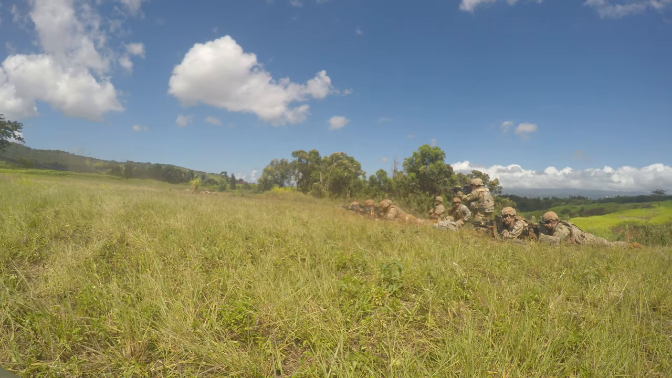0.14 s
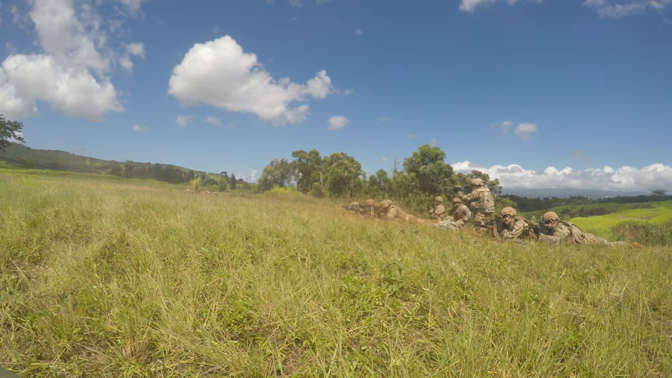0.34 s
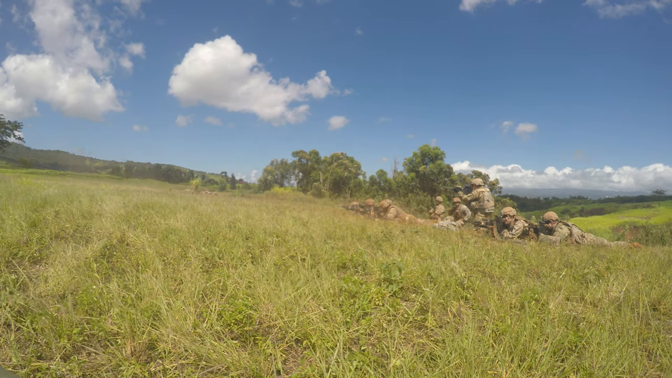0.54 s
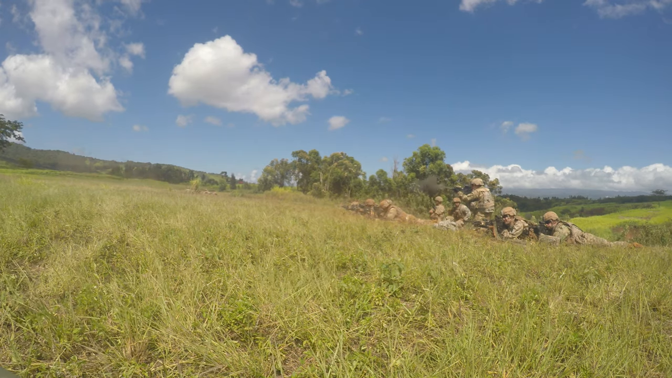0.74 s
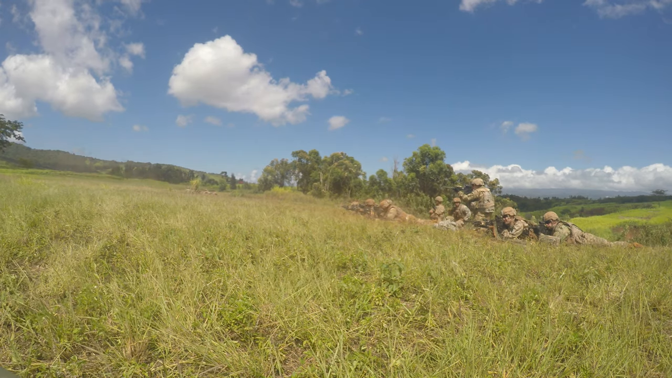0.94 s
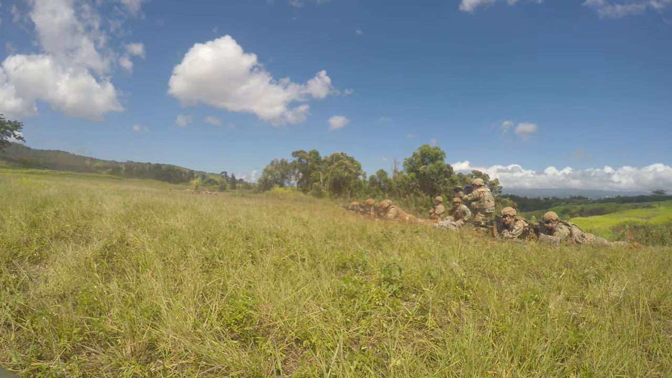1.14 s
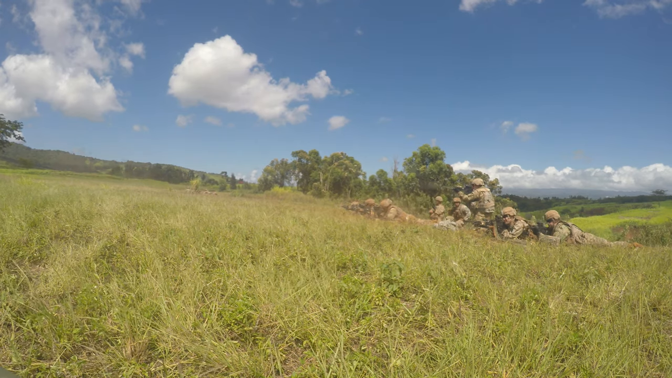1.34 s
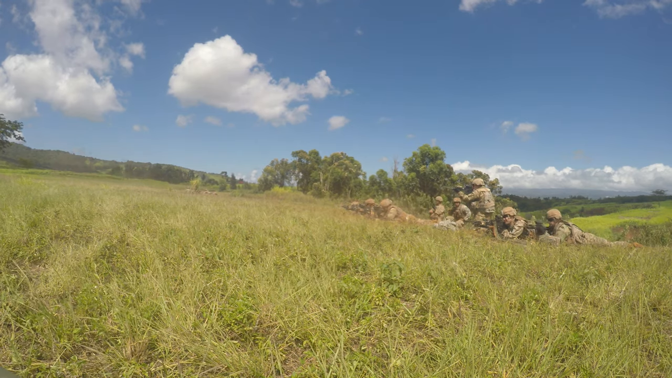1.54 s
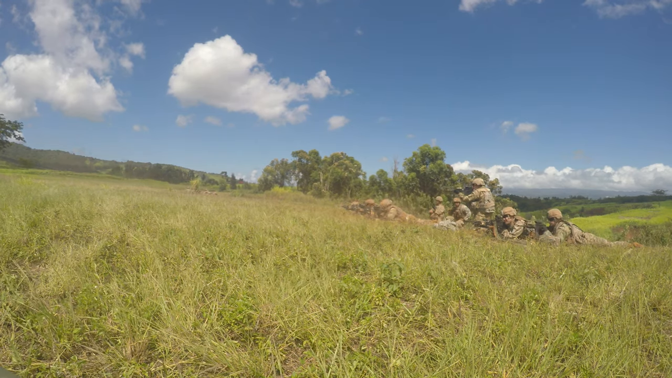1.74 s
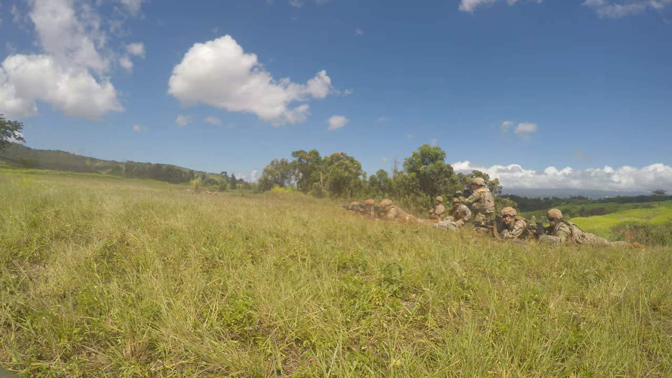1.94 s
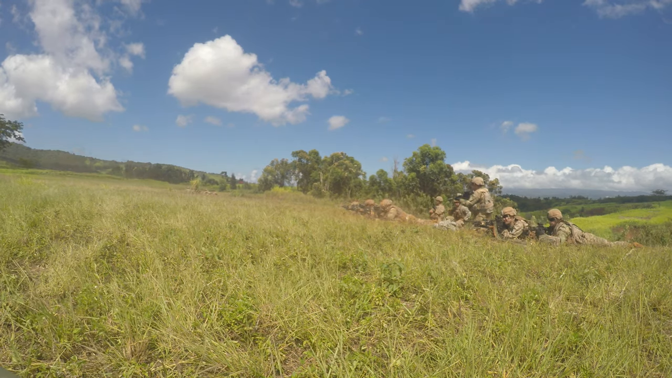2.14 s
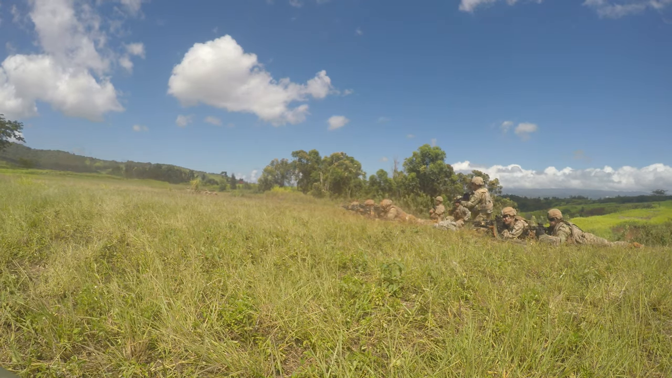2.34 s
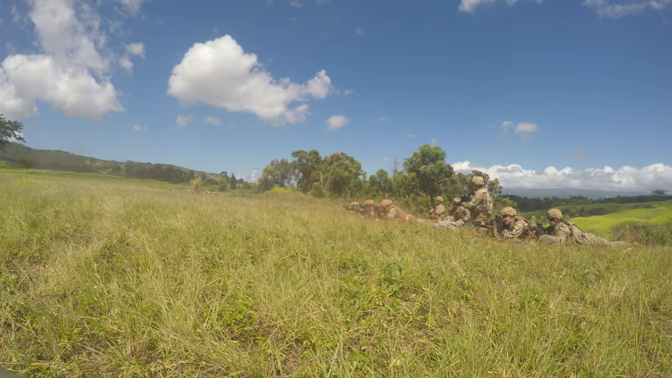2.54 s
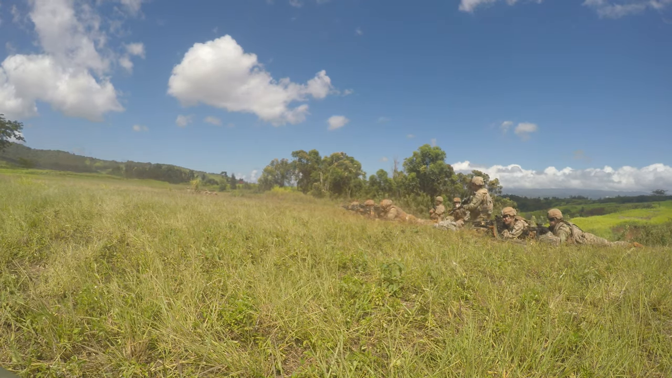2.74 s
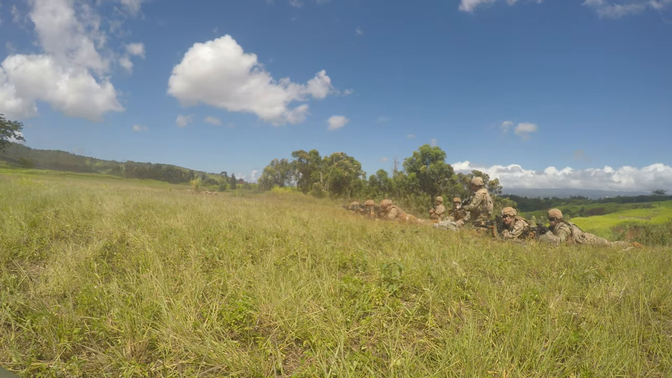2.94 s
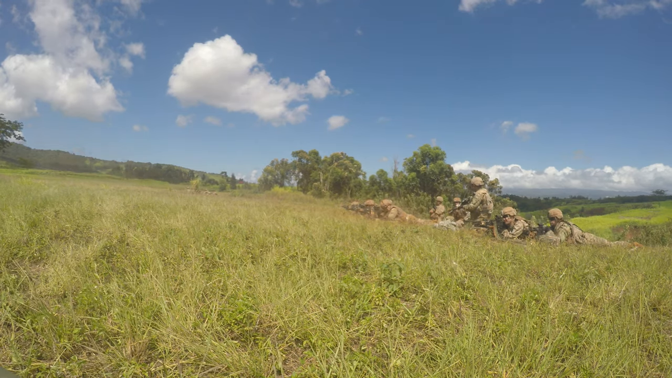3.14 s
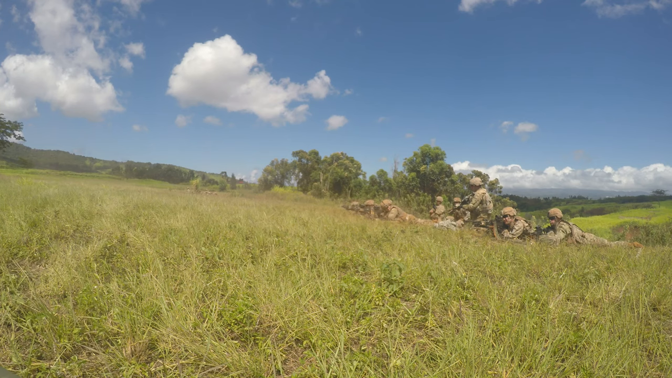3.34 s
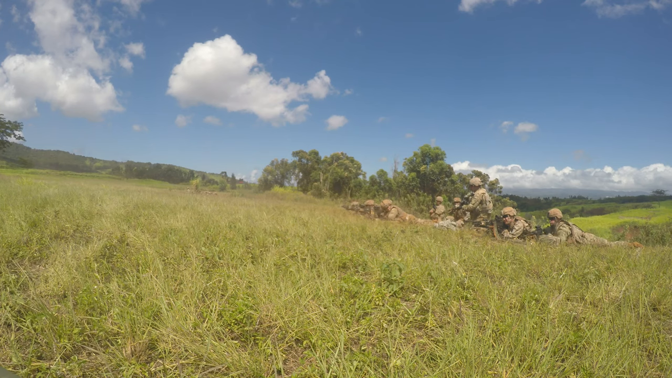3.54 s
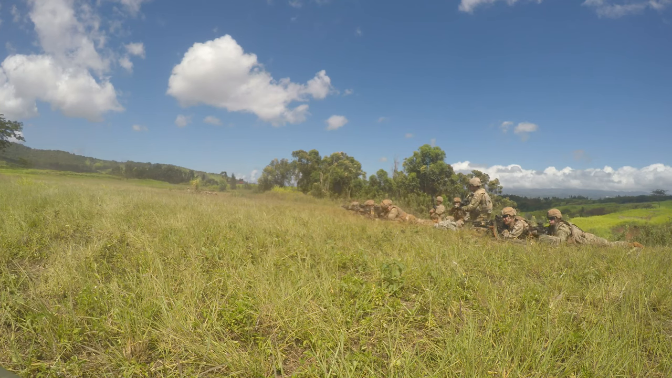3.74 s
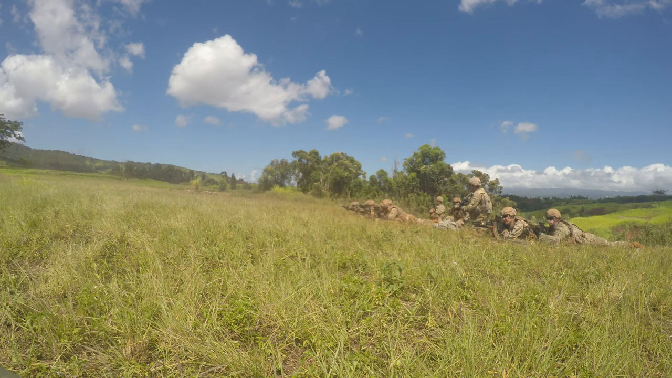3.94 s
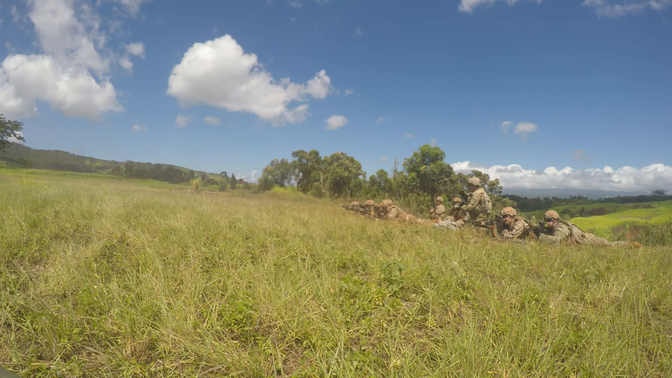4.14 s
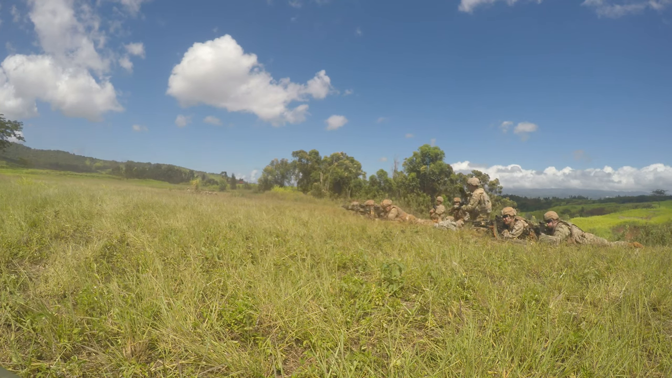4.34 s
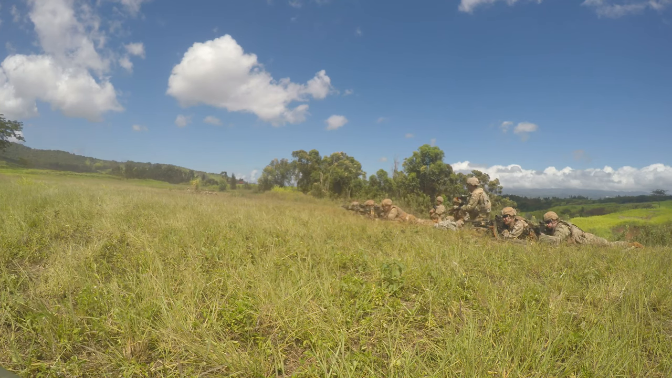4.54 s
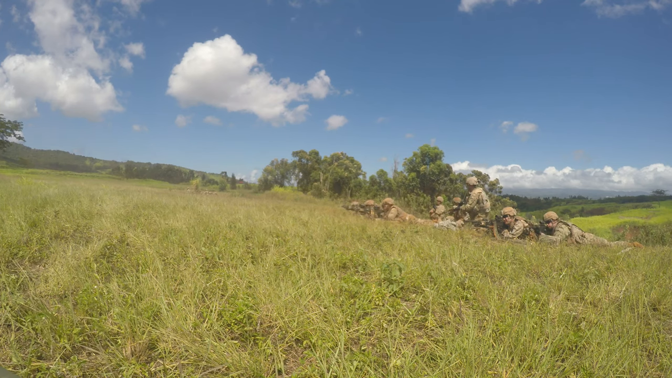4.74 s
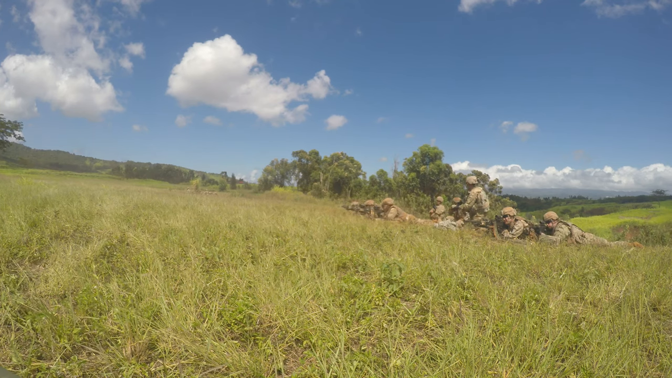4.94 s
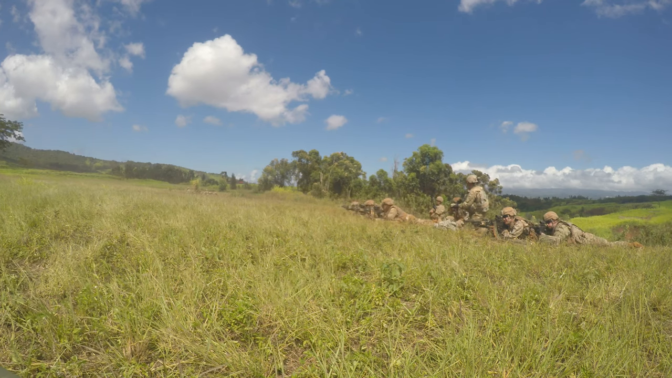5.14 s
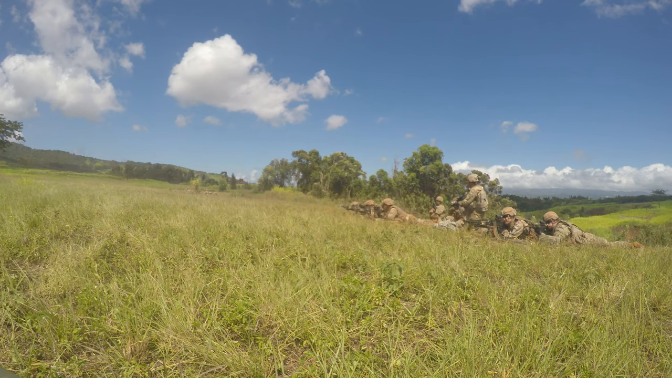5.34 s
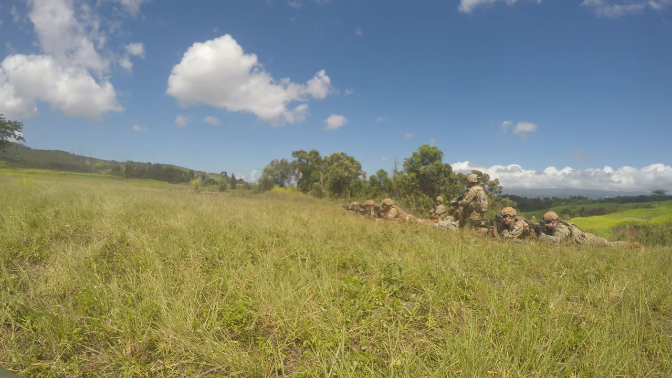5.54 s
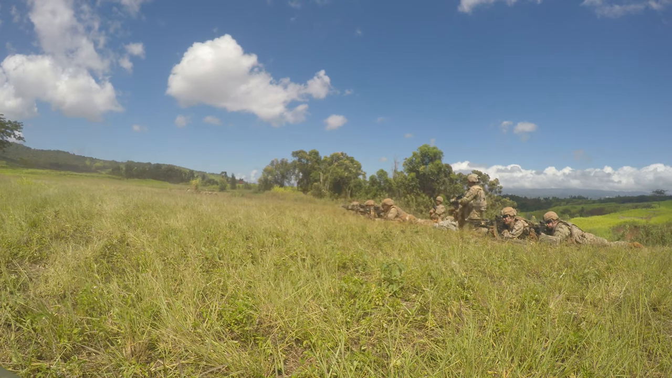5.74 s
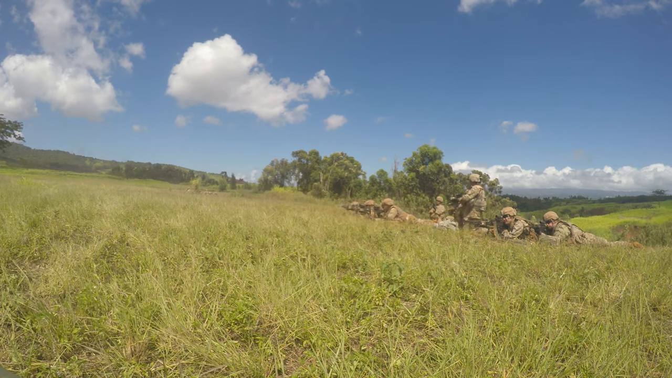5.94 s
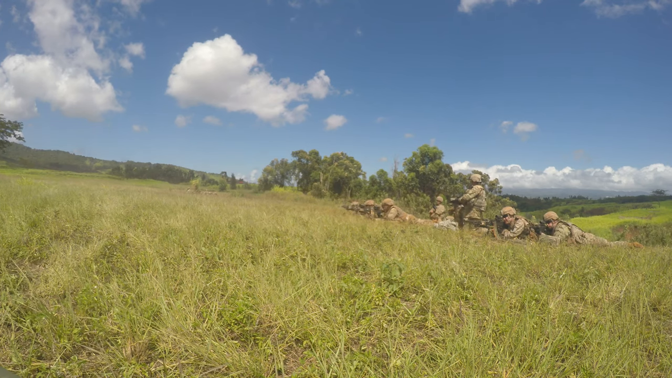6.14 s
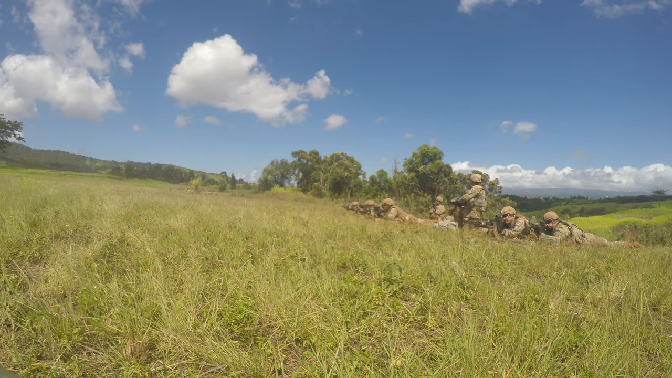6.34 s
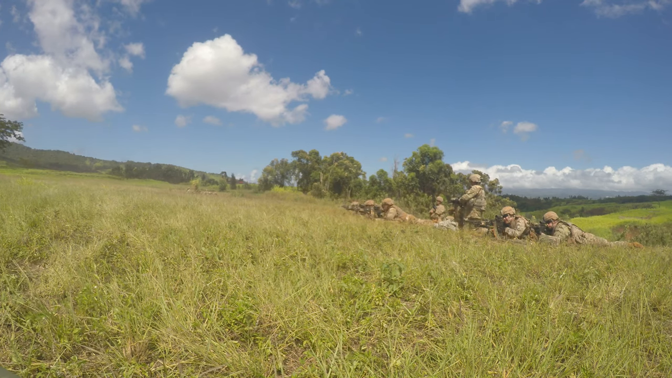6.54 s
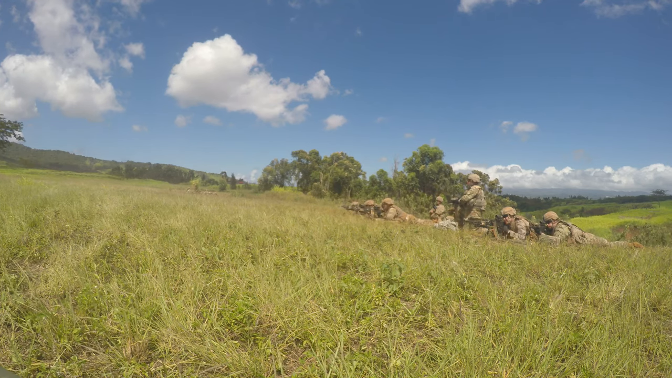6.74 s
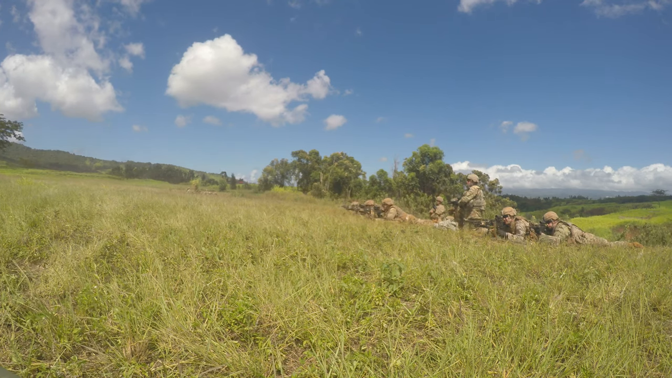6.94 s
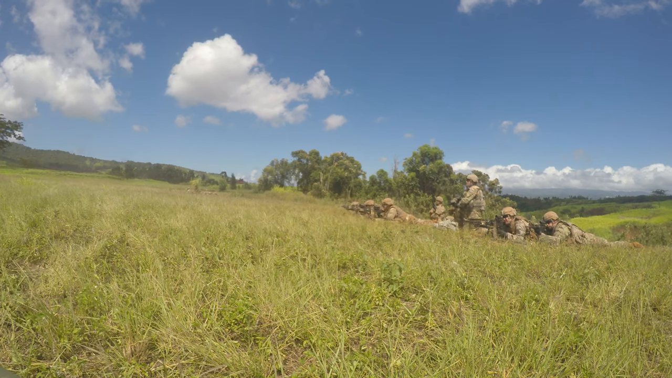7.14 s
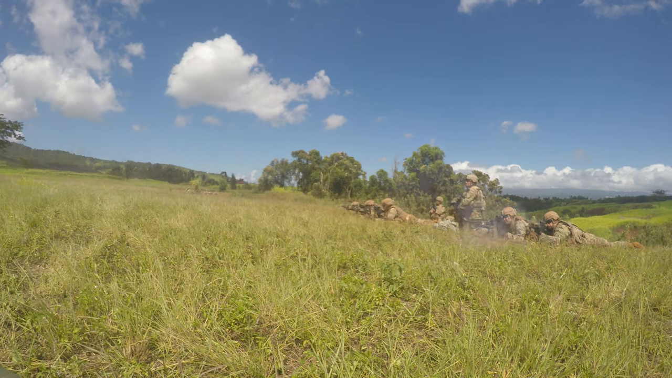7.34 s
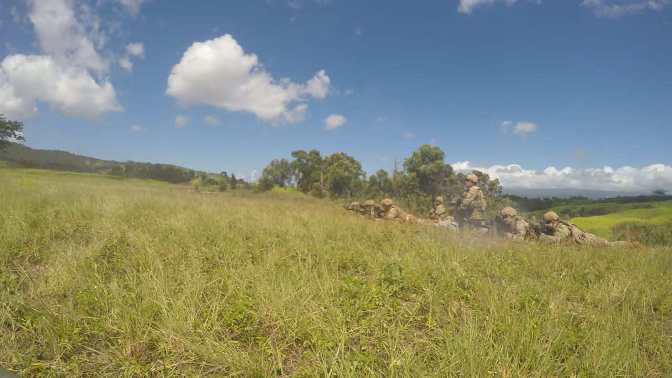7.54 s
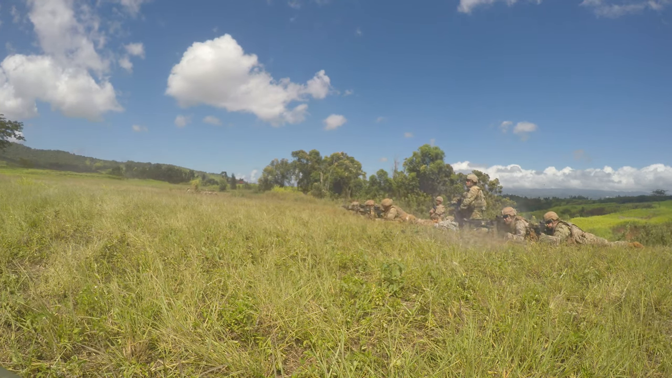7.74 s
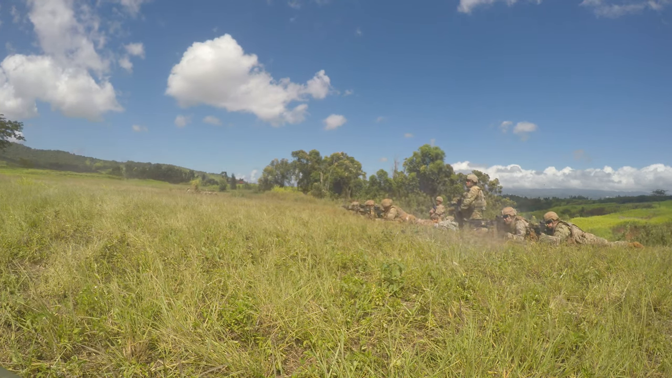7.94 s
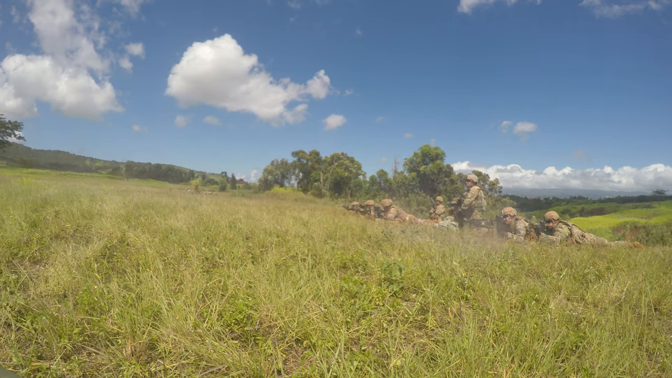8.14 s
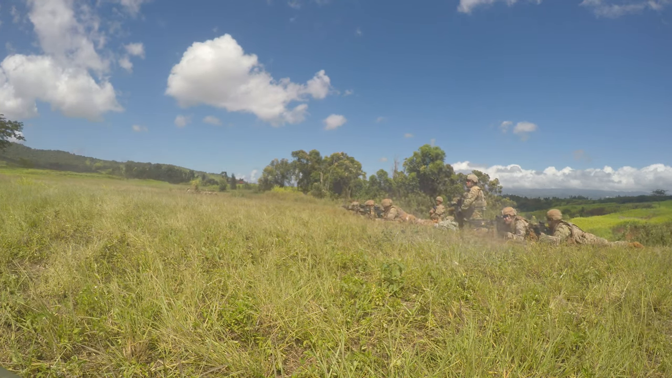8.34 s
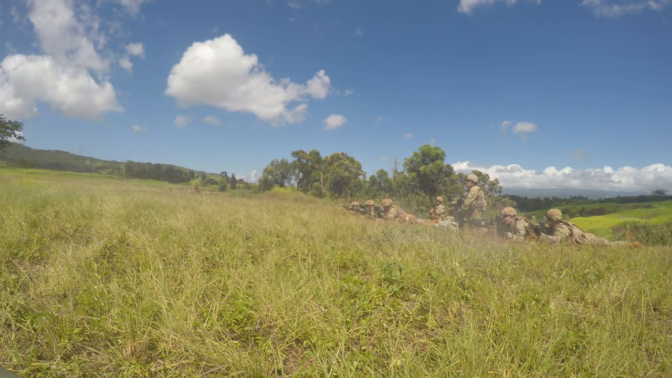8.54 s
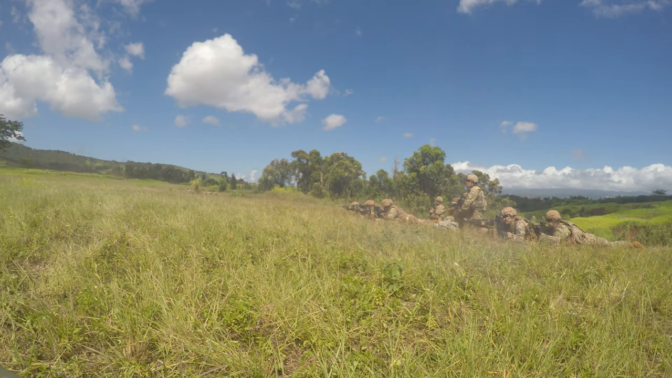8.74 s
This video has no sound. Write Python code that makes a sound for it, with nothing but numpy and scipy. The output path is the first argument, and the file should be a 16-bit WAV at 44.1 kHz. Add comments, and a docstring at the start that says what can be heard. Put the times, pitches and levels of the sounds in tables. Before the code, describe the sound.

Faint hiss and a low wash of hill echoes lie under everything on an open grass slope. At once a medium-speed machine gun fires; a close rifle cracks at 0.2 s and a slower gun joins from 0.3 to 1.6 s, with more close shots around 0.4, 0.8, 1.3, 1.7 and 2.0 s. From 1.9 s the medium and then slow guns hammer long overlapping bursts, stopping near 3.4 and 3.8 s, leaving echoes. The slow gun returns at 4.3 s, a close shot hits at 4.8 s, and medium and rapid guns rattle from about 5 to 6.4 s. Slow rounds continue; close shots strike at 6.8 s and, loudest, 7.2 s, after which farther fire is pushed down and climbs back. The rapid gun resumes at 7.6 s, and all three fire to the end, with a close shot at 8.3 s. The microphone case rings boxily, and nearest blasts clip.

```python
"""Live fire on an open grass slope: hiss and a low wash of hill echoes (shaped noise) are there from the start.
A middle-speed machine gun fires first, then a rifle close by and a slow gun join; rounds are cracks and thumps.
From 1.9 s both guns fire long bursts; the slow gun returns at 4.3 s, the middle and a fast one near 5 s.
After scattered close shots all three guns fire at the end. The farther fire starts sunk and climbs back, and sinks
again after each close shot. Throughout, the microphone case rings, and the nearest shots overload the input."""
import sys
import numpy as np
from scipy import signal
from scipy.fft import rfft, irfft
from scipy.io import wavfile

SR = 44100
rng = np.random.default_rng(int(sys.argv[2]) if len(sys.argv) > 2 else 0)


def master(y):
    """Save y as 16-bit WAV."""
    cut = np.clip(np.atleast_2d(y).T, -1, 1)
    pcm = np.round(cut * 32767)  # scale
    wavfile.write(sys.argv[1], SR, pcm.astype(np.int16))


N = 387198


def amp(db):
    """Turn decibels into a plain multiplying factor."""
    return 10 ** (np.asarray(db) / 20)


def clicks(times, db):
    """One single-sample click per event, as strong as its level says."""
    out = np.zeros(N)
    np.add.at(out, np.round(np.asarray(times) * SR).astype(int), amp(db))
    return out


def dying(x, t60):
    """Every click starts a smooth fall that drops 60 dB in t60 seconds."""
    keep_per_sample = amp(-60 / (t60 * SR))
    return signal.lfilter([1], [1, -keep_per_sample], x + 1e-18)


def noise(colour):
    """Random noise whose strength at each pitch follows a colour table; rms 1."""
    hz, db = np.transpose(colour)
    grid = np.maximum(np.arange(N // 2 + 1) * SR / N, 1)
    gain = amp(np.interp(np.log(grid), np.log(hz), db))
    x = irfft(rfft(rng.standard_normal(N)) * gain, N)
    return x / x.std()


def bands(x):
    """Split a sound into its low, low middle, high middle and high part."""
    shapes = [([300, 1400], "band"), ([1400, 2600], "band"), ([2600, 5000], "band"), (5000, "high")]
    return [signal.sosfilt(signal.butter(2, hz, kind, fs=SR, output="sos"), x) for hz, kind in shapes]


def lumps(depth_db):
    """Quick random swells, as when single echoes stand out of a noisy tail; depth is the rms swing."""
    return amp(depth_db * noise([(20, 1.5), (120, 3.5), (300, -38.5)]))


def echoes(x, table, dull_hz):
    """Direct sound plus delayed copies that have lost their treble on reflection."""
    back = sum(amp(db) * np.interp(np.arange(N) - s * SR, np.arange(N), x, left=0) for s, db in table)
    return x + signal.sosfilt(signal.butter(2, dull_hz, fs=SR, output="sos"), back)


# Slow gun, about 8 rounds a second; the bullet's crack comes before the muzzle:
# (time [s], crack level [dB], its part over 5 kHz [dB re crack], muzzle delay [ms], thump level [dB])
SLOW_GUN = [(0.311, -33, -5, 68, -24), (0.432, -31, -2, 76, -15), (0.5545, -19, -14, 78, -15.5),
            (0.6802, -22.5, -11, 83, -14.5), (0.821, -31, -10, 77, -16), (0.9413, -27, -11, 80, -16),
            (1.0759, -25, -9, 86, -17.5), (1.207, -20.5, -13.5, 82, -17), (1.3375, -42.5, -3, 88, -14),
            (1.471, -26.5, -5.5, 84, -18), (1.605, -22.5, -7.5, 103, -14), (2.48, -16.5, -9.5, 84, -14),
            (2.617, -14.5, -13, 84, -15), (2.7473, -12.0, -9.5, 81, -14.5), (2.8657, -15, -11, 85, -15),
            (2.9943, -12, -9, 98, -15), (3.1376, -19, -4.5, 93, -17.5), (3.263, -10.5, -9, 98, -18),
            (3.4067, -13.5, -7, 93.4, -15.5), (3.538, -14.5, -1.5, 89, -17.5), (3.6638, -14, -1, 92.4, -17),
            (3.7931, -16, -6, 95, -19.5), (4.2998, -18, -15, 75, -16.5), (4.4246, -19.5, -13.5, 78, -17),
            (4.5554, -17.5, -11, 80, -16.5), (4.695, -17, -11.5, 75, -13), (4.823, -18.5, -8, 82, -16),
            (4.9536, -20.5, -8, 79, -16.5), (5.078, -18, -8.5, 79, -17.5), (6.353, -21.5, -1.5, 87, -22),
            (6.4729, -18.5, -4.5, 95, -19), (6.6005, -21, -6, 88, -21), (6.7277, -24, -11, 110, -13),
            (6.8469, -23.5, -10, 94, -19), (6.9796, -18.5, -9.5, 83, -15), (7.1095, -19.5, -8, 123, -14),
            (7.3796, -23.5, -12.5, 130, -22.5), (7.5085, -23, -13, 84, -26), (8.109, -20, -10.5, 77, -17.5),
            (8.2357, -20.5, -7, 76, -11), (8.3603, -14.5, -8, 84, -18), (8.495, -20.5, -4, 89, -24),
            (8.6146, -20.5, -2.5, 79, -17), (8.7499, -17, -9.5, 85, -17)]
# Middle gun, about 10 rounds a second; its muzzle is heard just before the crack:
# (time [s], crack level [dB], its part over 5 kHz [dB re crack])
MIDDLE_GUN = [(0.048, -14, -20), (0.149, -19.5, -14.5), (0.357, -22, -15), (0.455, -17.5, -17),
              (0.5546, -18.5, -12), (0.6521, -22, -16), (1.8701, -17.5, -16), (2.0656, -12.5, -18),
              (2.1744, -15.5, -36), (2.2712, -15.5, -15.5), (2.3675, -14.5, -24), (2.449, -14, -28),
              (2.5435, -11.5, -13.5), (2.6512, -12, -9.5), (2.7473, -18, -23), (2.844, -10.5, -16),
              (2.9321, -10.5, -34), (3.0367, -8, -21), (3.1372, -8, -22), (3.224, -10.5, -15.5),
              (3.3308, -10.5, -50), (3.428, -11.5, -27), (5.0542, -21.0, -19), (5.1492, -22.5, -36),
              (5.2475, -14.5, -31), (5.343, -17, -22), (5.437, -17.5, -32), (5.5456, -19.5, -14),
              (5.6337, -19, -31), (5.7277, -20, -16), (5.8261, -16.5, -18), (5.9235, -15.5, -19),
              (6.0215, -14.5, -27), (6.1182, -17.5, -19), (6.218, -17.5, -16.5), (6.314, -16.5, -19),
              (6.4109, -17, -29), (7.9186, -12, -24), (8.0237, -14, -40), (8.1229, -14.5, -27),
              (8.221, -14, -23), (8.412, -12.5, -21), (8.5149, -12.5, -26), (8.598, -13.5, -35),
              (8.699, -12.5, -19)]
# Fast gun, about 13 rounds a second; crack and muzzle arrive together:
# (time [s], crack level [dB], thump level [dB])
FAST_GUN = [(5.182, -33.5, -18.5), (5.259, -31, -19), (5.338, -31.5, -15.5), (5.4183, -30, -18),
            (5.492, -30, -14.5), (5.573, -41, -18.5), (5.65, -30, -17), (5.7288, -30.5, -18.5),
            (5.809, -34.5, -14.5), (5.8878, -34, -15), (5.965, -32.5, -17), (6.046, -32.5, -17.5),
            (6.121, -34, -18.5), (6.2033, -34, -16), (6.281, -31, -17), (6.3613, -31, -19),
            (6.4415, -34.5, -13), (7.6195, -35, -18), (7.699, -33, -17), (7.78, -34.5, -18.5),
            (7.858, -35.5, -19.5), (7.942, -37, -19), (8.021, -41, -19.5), (8.102, -33, -17.5),
            (8.1815, -33.5, -17), (8.26, -31.5, -17), (8.338, -28, -13), (8.4133, -33, -14.5),
            (8.497, -26, -17), (8.574, -41, -16.5), (8.646, -33, -16.5), (8.7348, -32, -19.5)]
MIDDLE_LEAD_MS, MIDDLE_THUMP_DB = 19, -25   # muzzle ahead of the crack; its usual thump level
FAST_TREBLE_DB = 0.5   # part of the crack over 5 kHz, re the crack


def rounds():
    """Per gun, slow to fast: crack times, crack dB, treble dB, muzzle times and thump dB."""
    slow, slow_db, slow_treble, lag_ms, slow_thump_db = np.transpose(SLOW_GUN)
    middle, middle_db, middle_treble = np.transpose(MIDDLE_GUN)
    fast, fast_db, fast_thump_db = np.transpose(FAST_GUN)
    middle_muzzle = middle - MIDDLE_LEAD_MS / 1000
    return [(slow, slow_db, slow_treble, slow + lag_ms / 1000, slow_thump_db),
            (middle, middle_db, middle_treble, middle_muzzle, MIDDLE_THUMP_DB + 0 * middle),
            (fast, fast_db, FAST_TREBLE_DB + 0 * fast, fast, fast_thump_db)]


START_SINK_DB, FAST_SINK_DB = 16.5, 3   # sunk at the start; drop after each fast round
CLIMB_S = 0.88   # time constant of the return


def sinking():
    """dB lost by the farther fire: it drops after a shot, then climbs back; the deepest drop counts."""
    t = np.arange(0, N / SR, .001)
    close_drops = np.array(CLOSE)[:, [0, -1]]
    fast_drops = [(s, FAST_SINK_DB) for s, _, _ in FAST_GUN]
    drops = [(0, START_SINK_DB), *close_drops, *fast_drops]
    s, db = np.transpose(drops)[..., None]
    lost = np.max((t > s + .004) * db * np.exp(-np.abs(t - s) / CLIMB_S), axis=0)   # starts 4 ms late
    return np.interp(np.arange(N) / SR, t, lost)


# Colour of the wash of far echoes: (pitch [Hz], level [dB per Hz])
WASH_COLOUR = [(25, 1), (60, 2.5), (150, -3), (280, -8.5), (600, -9.5), (1100, -8.5), (1600, -7),
               (2800, -12), (4500, -11), (6000, -17), (7600, -28), (8600, -29), (11000, -32.5),
               (15000, -35.5)]
# What each machine-gun crack feeds to the wash: (over 600 Hz [dB re crack], under 600 Hz [dB re crack])
CRACK_ECHO_DB = (-28.5, -40)
WASH_HIGH, WASH_LOW = (-54.5, 0.91), (-54, 0.84)   # over and under 600 Hz: (floor [dB], echo t60 [s])
ECHO_RISE_S = 0.01   # how quickly each echo swells up
HISS_DB = -66   # steady hiss that does not sink


def wash(lost_db):
    """Far echoes of the gun cracks and muzzles merge into lumpy noise that swells and dies back to a floor."""
    x = noise(WASH_COLOUR)
    low = signal.sosfilt(signal.butter(1, 600, fs=SR, output="sos"), x)
    high = (x - low) * lumps(depth_db=1.3)
    out = 0
    for k, (part, (floor_db, t60)) in enumerate([(high, WASH_HIGH), (low, WASH_LOW)]):
        fed = 0   # echo power sent in by every round
        for (s, db, _, late, thump_db), muzzle in zip(rounds(), GUN_MUZZLE):
            heard = late < N / SR
            fed = fed + clicks(late[heard], (thump_db + muzzle[1 + k])[heard]) ** 2
            fed = fed + clicks(s, db + CRACK_ECHO_DB[k]) ** 2
        # t60 is halved because this fall is applied to power, not to amplitude
        swell = dying(fed, t60 / 2) - dying(fed, min(ECHO_RISE_S, t60 / 4))
        power = np.maximum(swell, 0) + amp(floor_db) ** 2
        level = np.sqrt(power * amp(-lost_db) ** 2 + amp(HISS_DB) ** 2)
        out = out + level * part / part.std()
    return out


# Colour of the weak scatter after a crack: (pitch [Hz], level [dB per Hz])
CRACK_COLOUR = [(300, -14.5), (600, -10), (1000, 7.5), (2000, 7), (4000, -10), (6000, 0), (7600, -13),
                (8600, -27), (11000, -21), (15000, -41.5)]
# A crack band by band, low to high: (snap length before stretching [ms], scatter t60 [s], scatter level [dB])
CRACK_DECAY = [(4.25, 0.057, -2), (1.25, 0.043, -3), (2.82, 0.056, -13.5), (2.17, 0.025, 3.5)]


def cracks(times, db, low_db, mid_db, high_db, stretch):
    """A shock splintered by grass and ground: milliseconds of ragged snap, each one new, then weak scatter."""
    size = 1024   # samples set aside for each snap
    ms = np.arange(size) / SR * 1000
    at = np.round(times * SR).astype(int)[:, None] + np.arange(size)
    splinters = signal.lfilter([1], [1, -.7], rng.laplace(size=at.shape))   # air has taken some treble
    out = np.zeros(N + size)
    for k, (scatter, shift) in enumerate(zip(bands(noise(CRACK_COLOUR)), (low_db, 0, mid_db, high_db))):
        snap_ms, scatter_t60, scatter_db = CRACK_DECAY[k]
        age = ms / (snap_ms * stretch)
        snap = bands(splinters * age ** .2 * np.exp(-age ** 1.5))[k]   # sudden start, quick end
        energy = np.sum(snap ** 2, axis=1, keepdims=True)
        snap /= np.sqrt(energy / (.005 * SR * stretch))   # even out the level over 5 ms, stretched
        np.add.at(out, at, amp(db + shift - 4.0)[:, None] * snap)
        fall = dying(clicks(times, db + shift + scatter_db), scatter_t60)
        out[:N] += scatter / scatter.std() * fall
    return out[:N]


def blast(push_s, dull_hz, lead_s, dip_db):
    """Muzzle blast: a short dip, then a push of air and a longer suction, rounded by the distance; peak 1."""
    t = np.arange(SR // 20) / SR
    push = np.maximum(t - lead_s, 0) / push_s
    push_and_suction = (t > lead_s) * (1 - push) * np.exp(-.2 * push ** 2)
    dip = amp(dip_db) * (t < lead_s) * (t > .4 * lead_s)
    shape = signal.sosfilt(signal.butter(2, dull_hz, fs=SR, output="sos"), push_and_suction - dip)
    return shape / shape.max()


def blasts(times, db, shape):
    """The same push of air placed at every time, at its own level."""
    return signal.oaconvolve(clicks(times, db), shape)[:N]


# Colour of each gun's crack, slow to fast: (under 1.4 kHz, 2.6-5 kHz [dB re 1.4-2.6 kHz])
GUN_COLOUR = [(2, 2.5), (-7.5, -3.5), (-1.5, 6.5)]
# Muzzle of each gun, slow to fast: (snap, echo fed to the wash over 600 Hz, under 600 Hz [dB re thump])
GUN_MUZZLE = [(-9, -28.5, -19), (-10.5, -20, -17), (-33, -25, -26)]
# Colour of the muzzle snap: (low, high middle, high [dB re low middle])
MUZZLE_COLOUR = (0.45, -3.5, -22.5)
# Lone weak cracks, some bright and some dull:
# (time [s], level [dB], under 1.4 kHz, 2.6-5 kHz, over 5 kHz [dB re level])
STRAYS = [(0.5384, -31, 6, 6, 1.5), (3.8687, -30, -12, -8, -26), (4.3672, -34, -17, -15, -29),
          (5.8715, -34.5, 11, -4, 8)]
# Rumble rolling behind a thump: (pitch [Hz], level [dB per Hz])
BODY_COLOUR = [(300, -9), (550, 1.5), (1100, 0), (1600, -12), (3500, -18), (7000, -40)]
# Reflections of a low blast, for the guns and the close rifle: (delay [s], level [dB])
BLAST_ECHOES = [(.0073, -21.5), (0.017, -8), (0.0217, -10), (0.03, -8)]
COLOUR_SPREAD_DB, MUZZLE_SPREAD_DB = 2.5, 0.97   # chance differences from round to round
BODY_DB, BODY_T60_S = -20, 0.23   # rumble level re the thump; its dying time


def machine_guns(lost_db):
    """Cracks and muzzle thumps of the bursts; every gun has its colour, every round strays a little from it."""
    snaps, thumps = list(STRAYS), []
    for gun, colour, (snap_db, _, _) in zip(rounds(), GUN_COLOUR, GUN_MUZZLE):
        for at, level, treble, late, thump_db in zip(*gun):
            chance = rng.standard_normal(4)
            round_colour = np.append(colour, treble) + COLOUR_SPREAD_DB * chance[:3]
            snaps.append((at, level, *round_colour))
            if late < N / SR:
                muzzle_db = thump_db + MUZZLE_SPREAD_DB * chance[3]
                thumps.append((late, muzzle_db))
                snaps.append((late, muzzle_db + snap_db, *MUZZLE_COLOUR))
    s, db, *colours = np.transpose(snaps)
    late, thump_db = np.transpose(thumps)
    db = db - lost_db[(s * SR).astype(int)]
    thump_db = thump_db - lost_db[(late * SR).astype(int)]
    body_fall = dying(clicks(late, thump_db + BODY_DB), BODY_T60_S)
    body = noise(BODY_COLOUR) * body_fall * lumps(depth_db=2.5)
    push = blast(0.0016, dull_hz=383, lead_s=0.002, dip_db=-11.0)
    low = echoes(blasts(late, thump_db, push), BLAST_ECHOES, dull_hz=654)
    return cracks(s, db, *colours, stretch=0.85) + body + low


# Close shots; the row at 7.195 s is a second, longer push of the 7.19 s shot:
# (time [s], crack level at 1.4-2.6 kHz [dB], under 1.4 kHz, 2.6-5 kHz, over 5 kHz [dB re crack],
# muzzle blast [dB], blast push [ms], tail [dB], metal ring [dB], sinking of the farther fire [dB])
CLOSE = [(0.2237, -7, 1, -1, -10, -8.5, 2.5, -13, -46.5, 20.3),
         (0.409, -18.5, 3, 0, -4, -14, 1.3, -25, -73, 14.3),
         (0.77, -6, -27, -3.5, -14, -10, 2.4, -10, -61, 17.2),
         (1.347, -5, -2.5, -4, -15, -10, 2.4, -13, -48, 20.6),
         (1.6759, -18, 5.5, -1, -6.5, -14, 0.85, -19.5, -53, 22),
         (1.9675, -14, 3, 1, -5, -12, 2.6, -14, -53, 19),
         (4.7603, -11, 6, 4, -4.5, -2, 1.52, -14, -57, 10.2),
         (6.7804, -12.5, 7.5, 3.5, -3.5, -4, 2, -10.5, -48, 10.3),
         (7.1916, -3.5, -1.5, -0.5, -9, 1.5, 1.7, -15, -66.5, 30.7),
         (7.195, -20, 5.5, -5.5, -15, -5.5, 11, -13.5, -66, 27),
         (8.313, -13.5, 6.5, 2.5, -0.5, -8.5, 1.76, -22, -61, 14.3)]
# Reflections off the ground and bank near the close rifle: (delay [s], level [dB])
CLOSE_ECHOES = [(.0065, -19), (.0172, -12), (.0222, -13), (.033, -17.5), (0.048, -25.5), (0.063, -28)]
# Colour of the close tail: (pitch [Hz], level [dB per Hz])
TAIL_COLOUR = [(200, 12), (400, 3), (700, 8), (1200, 12), (1700, 6), (2600, -11.5), (3300, -12),
               (5000, -39), (9000, -16.5), (15000, -12.5)]
# Dying of the close tail in the four bands, low to high: (t60 [s])
TAIL_T60 = [0.17, 0.12, 0.068, 0.063]
METAL_HZ, METAL_T60_S = 1766, .9   # a thin metal ring left by the close shots


def close_rifle():
    """Crack with its reflections, a low blast, a tail that loses its treble first, and a metal ring."""
    s, db, low_db, mid_db, high_db, blast_db, push_ms, tail_db, ring_db, _ = np.transpose(CLOSE)
    snap = cracks(s, db, low_db, mid_db, high_db, stretch=1.23)
    crack = echoes(snap, CLOSE_ECHOES, dull_hz=1440)
    tail = sum(part * dying(clicks(s, tail_db), t60) for part, t60 in zip(bands(noise(TAIL_COLOUR)), TAIL_T60))
    low = 0
    for at, level, ms in zip(s, blast_db, push_ms):
        push = blast(ms / 1000, dull_hz=604, lead_s=0.0018, dip_db=-11.5)
        low = low + blasts([at], level, push)
    tone = np.sin(2 * np.pi * METAL_HZ * np.arange(N) / SR)
    ring = dying(clicks(s, ring_db), METAL_T60_S) * tone
    return crack + tail * lumps(depth_db=4.5) + echoes(low, BLAST_ECHOES, dull_hz=585) + ring


def scene():
    """All sources added together in the air at the microphone case."""
    lost_db = sinking()
    return (close_rifle() + machine_guns(lost_db) + wash(lost_db))[None]


# Cavities of the microphone case: (pitch [Hz], width [Hz], level [dB re direct sound])
CASE = [(89.8, 3.7, 2), (115, 20, 1), (192, 9.5, 15.5), (294, 38, -5.5), (426, 23.5, 4.5), (1105, 53, 1.5),
        (1804, 27.7, 11), (1960, 130, 2), (2193, 180, 2.5), (2430, 100, 0.5), (2883, 327, 10),
        (3474, 140, 12), (4060, 150, 8.5), (4363, 120, 7), (4714, 140, 2.5), (5740, 160, 7.5),
        (7160, 684, 11), (9300, 300, -33), (10390, 710, 0)]
KNEE = 9   # hardness of the clipping: higher is more sudden
CUTOFF_HZ = 16500   # above this the treble is removed


def record(dry):
    """The case adds its ringing, the input clips, and the top is cut."""
    inside = dry.copy()
    for hz, width, db in CASE:
        r = np.exp(-np.pi * width / SR)   # a narrow cavity rings longer
        feed = [(1 - r * r) / 2, 0, (r * r - 1) / 2]
        ringing = [1, -2 * r * np.cos(2 * np.pi * hz / SR), r * r]
        inside += amp(db) * signal.lfilter(feed, ringing, dry)
    inside = signal.sosfilt(signal.butter(1, 35, "high", fs=SR, output="sos"), inside)
    clipped = .86 * inside / (1 + np.abs(inside) ** KNEE) ** (1 / KNEE)
    return signal.sosfilt(signal.cheby2(14, 80, CUTOFF_HZ, fs=SR, output="sos"), clipped)


dry = scene()
out = record(dry)
master(out)
```